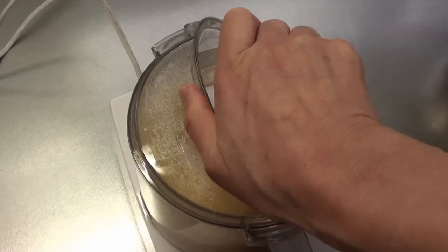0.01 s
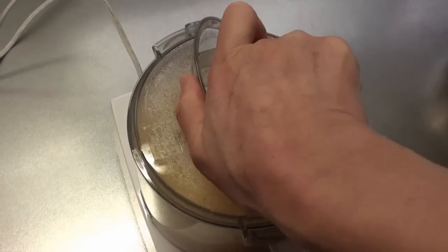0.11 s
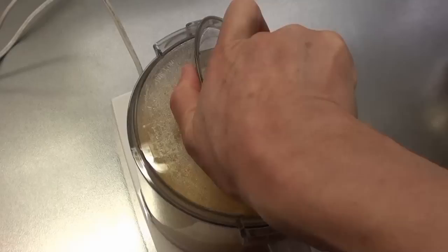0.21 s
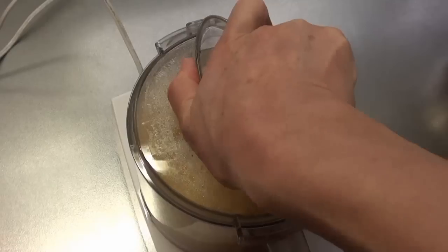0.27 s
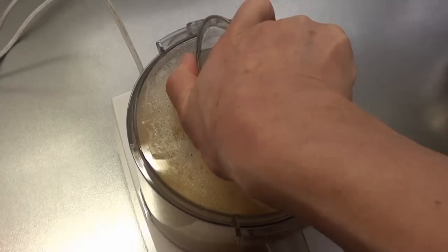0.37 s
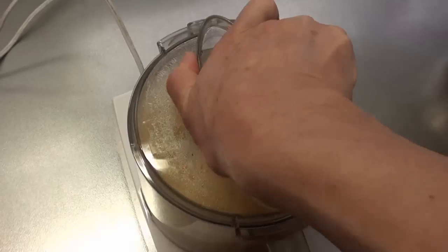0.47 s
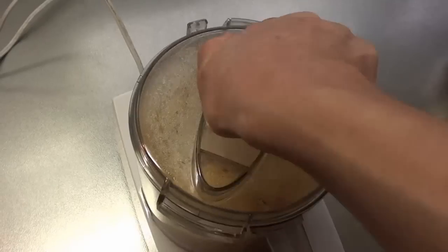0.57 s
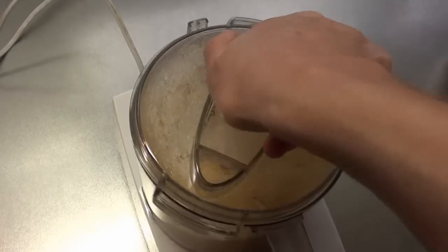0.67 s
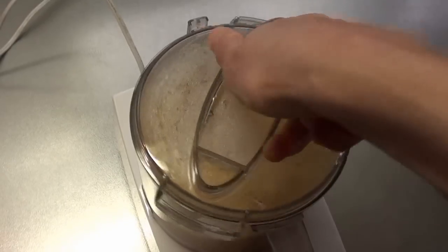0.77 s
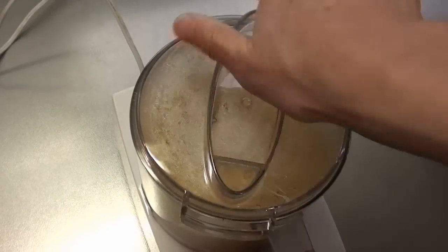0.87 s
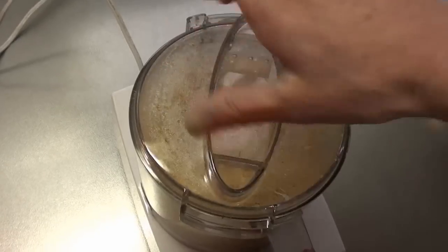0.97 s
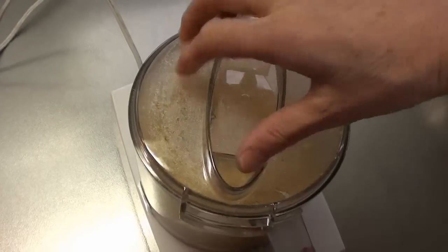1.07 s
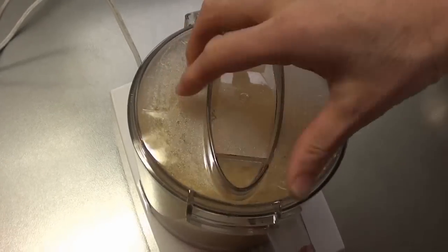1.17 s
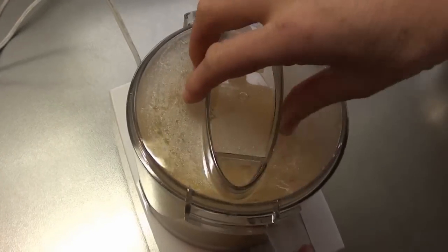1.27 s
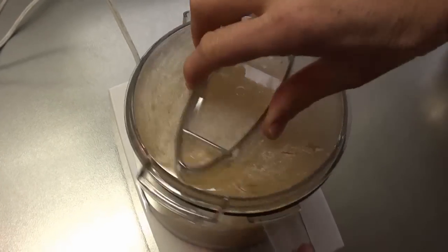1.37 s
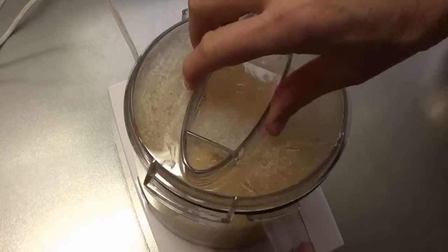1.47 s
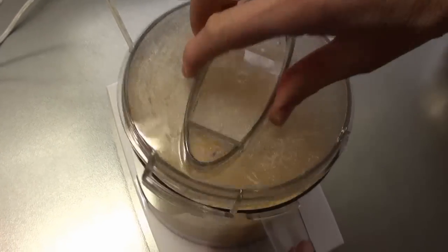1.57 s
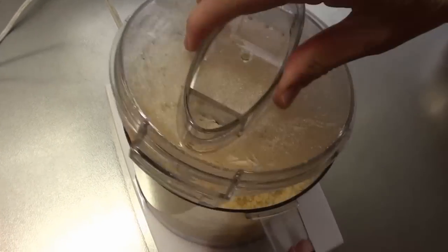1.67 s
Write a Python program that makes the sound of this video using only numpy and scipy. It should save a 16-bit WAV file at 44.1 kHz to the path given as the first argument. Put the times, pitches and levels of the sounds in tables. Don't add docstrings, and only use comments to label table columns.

```python
import sys
import numpy as np
from scipy import signal
from scipy.fft import rfft, irfft, next_fast_len
from scipy.io import wavfile

SR = 44100
rng = np.random.default_rng(int(sys.argv[2]) if len(sys.argv) > 2 else 0)


def to_linear_factor(level_db):
    exponent = np.asarray(level_db, float) / 20
    return 10 ** exponent


def dump(signal):
    limited = np.clip(np.atleast_2d(signal).T, -1, 1)
    pcm = np.round(limited * 32767).astype(np.int16)
    wavfile.write(sys.argv[1], SR, pcm)


N = 77175


def rms_one(x):
    return x / np.sqrt(np.mean(x ** 2) + 1e-20)


def butter(x, order, hz, kind):
    return signal.sosfilt(signal.butter(order, hz, kind, fs=SR, output="sos"), x)


def drift(rate_hz):
    r = np.exp(-2 * np.pi * rate_hz / SR)
    settle = 9000
    noise = rng.standard_normal(N + settle)
    return rms_one(signal.lfilter([1], [1, -2 * r, r * r], noise)[settle:])


def ring(clicks, hz, t60):
    r, w = to_linear_factor(-60 / (t60 * SR)), 2 * np.pi * hz / SR
    return signal.lfilter([0, np.sin(w)], [1, -2 * r * np.cos(w), r * r], clicks + 1e-18)


def colour(x, spectrum, patchy_db):
    edges = 30 * 2 ** np.arange(0, 9.1, .5)
    hz, db = np.transpose(spectrum)
    out = 0
    for k, (low, high) in enumerate(zip(edges, edges[1:])):
        band = butter(x, 2, [low, high], "band")
        level_db = np.interp(np.log(low * high) / 2, np.log(hz), db)
        out = out + (-1) ** k * to_linear_factor(level_db + patchy_db * drift(2.4)) * band
    return rms_one(out)


def pair(alike):
    mid, side = rng.standard_normal((2, N))
    return np.sqrt(1 + alike) * mid + np.sqrt(1 - alike) * side * [[1], [-1]]


def bounced(table):
    bounce_s, loss_db, unevenness = 0.0018, 2.5, 0.223
    rows = np.repeat(np.array(table), 3, axis=0)
    chance = rng.standard_normal((len(rows), 41))
    bounce = np.arange(len(rows)) % 3
    s, db, *rest = rows.T
    s = s + bounce_s * bounce * (1 + unevenness * chance[:, 40])
    return chance, s, db - loss_db * bounce, *rest


def bursts(s, db, t60):
    clicks = np.zeros(N)
    np.add.at(clicks, (s * SR).astype(int), to_linear_factor(db))
    envelope = signal.lfilter([1], [1, -to_linear_factor(-60 / (t60 * SR))], clicks + 1e-18)
    return envelope * rng.standard_normal(N)


def strike(modes, s, db, favoured_hz, chance):
    favour_db_per_octave, spread_db = 15, 2.2
    out = np.zeros(N)
    for k, (hz, mode_db, t60) in enumerate(modes):
        octaves_off = np.abs(np.log2(hz / favoured_hz))
        level_db = db + mode_db - favour_db_per_octave * octaves_off + spread_db * chance[:, k]
        clicks = np.zeros(N)
        np.add.at(clicks, (s * SR).astype(int), np.sign(chance[:, k + 20]) * to_linear_factor(level_db))
        out += ring(clicks, hz, t60)
    return out


# start in seconds, lid level in dB, hollow bowl level in dB against the lid,
# favoured lid pitch in Hz, favoured bowl pitch in Hz.
KNOCKS = [(.012, -25, 5.5, 1920, 226), (.145, -16.5, -13.5, 1370, 526), (.203, -10.5, 2, 1200, 204),
          (.262, -22, -7, 1440, 480), (.285, -12, -31, 2500, 550), (.318, -15.5, -26, 2600, 597),
          (.401, -10, -15.5, 2340, 613), (.584, -19.5, 0, 3400, 636), (.753, -28, 11, 860, 240),
          (.837, -18, 0, 1010, 286), (.856, -17, -14, 1360, 345), (.881, -2.5, -9.5, 1540, 480),
          (.897, -17.5, 1, 835, 480), (.958, -27, 12, 2560, 353), (1.058, -34, 18, 910, 272),
          (1.145, -46, 2, 1400, 346), (1.201, -3.5, -2, 1100, 360), (1.341, -4, -1, 1250, 238),
          (1.424, -14, 4.5, 1300, 700), (1.483, -23, 8.5, 1990, 242), (1.506, -28.5, 2, 1370, 405),
          (1.539, -16.5, -1, 1700, 530), (1.626, -34, 11, 1900, 247), (1.665, -35.5, 5.5, 1900, 550)]
# pitch in Hz, level in dB, t60 in seconds.
BOWL_MODES = [(77.6, -1, 0.052), (106, -64, 0.049), (226, -13, 0.25), (249.3, -16.5, 0.18),
              (382, -1.5, 0.053), (480, 2.5, 0.072), (525.5, -2.5, 0.066), (592, 5.5, 0.031)]
# pitch in Hz, level in dB, t60 in seconds.
LID_MODES = [(810, 0.5, 0.051), (964, -12, 0.025), (1090, -27, 0.06), (1300, -5.5, 0.026),
             (1505, -7.5, 0.06), (1990, -8.5, 0.033), (2198, -3, 0.047), (2600, 6.5, 0.024),
             (2954, -4, 0.098), (3400, 5.5, 0.036), (3660, 16, 0.012)]


def knocks():
    bowl_level_db, lid_level_db, thud_db, boom_db = -14, -13.5, -9.5, -8
    thud_t60_s, bowl_delay_s = 0.055, 0.00088
    chance, s, db, bowl_db, lid_hz, bowl_hz = bounced(KNOCKS)
    thud = butter(bursts(s, db + thud_db, thud_t60_s), 2, [520, 1940], "band")
    boom = butter(bursts(s, db + bowl_db + boom_db, thud_t60_s), 2, [182, 540], "band")
    s, db, bowl_db, lid_hz, bowl_hz, chance = (v[::3] for v in (s, db, bowl_db, lid_hz, bowl_hz, chance))
    bowl = strike(BOWL_MODES, s + bowl_delay_s, db + bowl_db + bowl_level_db, bowl_hz, chance)
    lid = strike(LID_MODES, s, db + lid_level_db, lid_hz, chance[:, ::-1])
    return bowl + lid + thud + boom


# start in seconds, pitch in Hz, level in dB, t60 in seconds.
RINGS = [(0.205, 228, -22, 0.092), (0.202, 1230, -19.5, 0.028), (.318, 566, -31, 0.16),
         (.4015, 557, -20.5, 0.14), (.4015, 2230, -17.5, 0.03), (0.4032, 1454, -26, 0.051),
         (0.586, 635, -36, 0.029), (0.614, 364, -25, 0.2), (.628, 363, -40, 0.27), (.645, 227, -23, 0.11),
         (.753, 238, -25, 0.066), (.755, 515, -23, 0.021), (.838, 248, -26.5, 0.038),
         (.881, 817, -21.5, 0.12), (0.879, 1375, -22.5, 0.096), (.882, 1921, -15, 0.051),
         (0.881, 2970, -24, 0.11), (.882, 477.5, -16, 0.077), (0.896, 456, -23, 0.097),
         (0.956, 265, -27.5, .06), (1.2, 350.5, -11.5, 0.069), (1.202, 238, -15, 0.051),
         (1.202, 630, -13, 0.04), (1.202, 810, -17.5, 0.05), (1.203, 1310, -12, 0.037),
         (1.34, 230, -20, .1), (1.343, 967, -21, 0.084), (1.344, 1940, -21.5, 0.045),
         (1.352, 446, -17, 0.047), (1.343, 841, -28.5, .15), (1.424, 650, -29.5, 0.038),
         (1.422, 1380, -28, 0.093), (1.445, 232, -32, 0.19), (1.506, 836, -29.5, 0.042),
         (1.54, 528, -34, 0.19), (1.54, 1810, -27.5, 0.049), (1.541, 1156, -33, 0.044),
         (1.627, 1954, -41, 0.051), (1.665, 1975, -43.5, 0.097)]


def rings():
    rise_cycles, flutter_db, flutter_hz, flutter_onset_s = 0.52, 3.5, 60, .02
    s, hz, db, t60 = np.transpose(RINGS)[:, :, None]
    age = np.clip(np.arange(N) / SR - s, 0, None)
    flutter = flutter_db * np.array([drift(flutter_hz) for _ in s])
    flutter = flutter * np.clip(age / flutter_onset_s, 0, 1)
    decay = to_linear_factor(db + flutter - 60 * age / t60)
    swell = 1 - np.exp(-age * hz / rise_cycles)
    return (decay * swell * np.sin(2 * np.pi * hz * age)).sum(axis=0)


# start in seconds, level in dB, pitch in Hz.
SNAPS = [(.012, -44, 3950), (.145, -26.5, 4600), (.196, -26.5, 8750), (.203, -17.5, 7070),
         (.247, -47, 4000), (.262, -36, 4160), (.285, -18.5, 3900), (.318, -16.5, 3360),
         (.401, -12.5, 3700), (.404, -14, 3420), (.584, -13.5, 3540), (.597, -11, 3200), (.837, -24, 5900),
         (.881, -21.5, 6700), (1.03, -35.5, 9200), (1.058, -32.5, 7400), (1.141, -46.5, 2620),
         (1.201, -27.5, 4100), (1.311, -52, 3200), (1.330, -29, 3100), (1.341, -25, 6200),
         (1.424, -25.5, 2640), (1.483, -28, 7200), (1.539, -31, 6600), (1.649, -36.5, 7260),
         (1.665, -42, 3330)]


def snaps():
    tone_db, crack_db, crack_t60_s = 7.5, -10, 0.011
    cycles, detune, longest_s = 15, 0.039, .1
    chance, s, db, snap_hz = bounced(SNAPS)
    t = np.arange(N) / SR - s[:, None]
    age = np.clip(t, 0, longest_s)
    decay = to_linear_factor(db[:, None] + tone_db - 60 * age * snap_hz[:, None] / cycles)
    hz = snap_hz * (1 + detune * chance[:, 0])
    tones = decay * np.sin(2 * np.pi * hz[:, None] * age)
    crack = butter(bursts(s, db + crack_db, crack_t60_s), 2, 1800, "high")
    return (tones * (t < longest_s)).sum(axis=0) + crack


# time in seconds, pitch in Hz, level in dB, lowest partial in dB against its usual level.
SQUEAKS = [
    [(.3175, 1365, -50, -6), (.319, 1385, -16.5, -5), (.328, 1330, -17, -9.5), (.335, 1324, -21, 11.5),
     (.341, 1362, -24, -2), (.352, 1325, -30, 0), (.36, 1340, -59, -8), (.37, 1356, -33, 5),
     (.40, 1378, -44, 8)],
    [(.582, 1350, -50, -7), (.586, 1368, -16.5, 8), (.596, 1334, -17, -5.5), (.604, 1356, -18.5, 8),
     (.622, 1336, -30.5, -6), (.655, 1370, -27, -3), (.70, 1330, -35, 4), (.715, 1335, -47, -7),
     (.745, 1380, -39.5, 8.5)],
]
PARTIALS_DB = [-6.5, -0.5, -6, -9, -14, -15, -23, -28]


def squeaks():
    wander_db, wander_hz, jitter, release_s = 2.6, 110, .007, .02
    t = np.arange(N) / SR
    out = 0
    for s, hz, db, lowest_db in map(np.transpose, SQUEAKS):
        pitch = np.interp(t, s, hz) * (1 + jitter * drift(140))
        phase = 2 * np.pi * np.cumsum(pitch) / SR
        stack = 0
        for k, partial_db in enumerate(PARTIALS_DB):
            level_db = partial_db + wander_db * drift(wander_hz)
            if k == 0:
                level_db = level_db + np.interp(t, s, lowest_db)
            stack = stack + to_linear_factor(level_db) * np.sin((k + 1) * phase + rng.uniform(0, 2 * np.pi))
        release_db = 20 * np.clip(t - s[-1], 0, None) / release_s
        out = out + to_linear_factor(np.interp(t, s, db, left=-99) - release_db) * stack
    return out


# time in seconds, level in dB, hollow share in dB.
STROKES = [
    [(0, -38, 9), (.03, -47, -57), (.07, -63, -4), (.14, -56.5, 4), (.19, -46.5, 5.5), (.27, -51, 6.5),
     (.325, -38, -24), (.41, -33.5, -20), (.5, -47.5, -3.5)],
    [(.562, -57, -5), (.572, -43.5, -17), (.586, -23.5, -27), (.61, -16.5, -10.5), (.635, -18.5, -8.5),
     (.66, -24, -6.5), (.69, -36.5, -4), (.76, -43, -8.5)],
    [(.833, -53, -3), (.84, -31.5, -14.5), (.872, -37.5, 9), (.885, -21, -15), (.91, -35.5, 1),
     (.965, -45, -9), (1.0, -52, -4), (1.07, -55, -1)],
    [(1.19, -49.5, 2), (1.3, -60, 11), (1.315, -46.5, 6), (1.40, -53.5, 8.5), (1.425, -32.5, -4),
     (1.46, -37.5, -1), (1.49, -40.5, 1), (1.53, -65, 5), (1.61, -82, 16), (1.665, -43, -1.5),
     (1.7, -76, 9)],
]
# frequency in Hz, density in dB per Hz.
RASP_COLOUR = [(410, -85), (700, -8), (2380, -5.5), (2630, -2), (4430, -9.5), (5450, -9), (11000, -13.5),
               (14300, -44), (22000, -120)]
# pitch in Hz, level in dB, t60 in seconds.
STROKE_MODES = [(102, -13, 0.097), (226, -8.5, 0.19), (362.3, -6, 0.11), (480, -4, 0.02),
                (545, -7.5, 0.086), (650, 1, 0.028)]


def rubbing():
    grains_per_s, spread_db, flutter_db, lid_db = 8000, 3.2, 2.2, -7
    s, db, hollow_db = np.transpose([row for stroke in STROKES for row in stroke])
    t = np.arange(N) / SR
    sizes = to_linear_factor(spread_db * np.minimum(rng.exponential(1, N), 4))
    sizes = sizes * (rng.random(N) < grains_per_s / SR)
    grains = rms_one(sizes) * pair(alike=0.75) * to_linear_factor(flutter_db * drift(40))
    rasp = colour(grains, [(300, -40)] + list(RASP_COLOUR), patchy_db=1.5)
    bright = rasp + to_linear_factor(lid_db) * body(LID_MODES, grains)
    hollow = to_linear_factor(np.interp(t, s, hollow_db)) * body(STROKE_MODES, grains)
    return to_linear_factor(np.interp(t, s, db)) * (bright + hollow)


def body(modes, grains):
    return rms_one(sum(to_linear_factor(db) * (-1) ** k * ring(grains, hz, t60) for k, (hz, db, t60) in enumerate(modes)))


def kitchen(x):
    t60_s, wall_cut_hz = 0.17, 2000
    size = next_fast_len(N + SR)
    w = 2 * np.pi * np.arange(size // 2 + 1) / size
    out = np.zeros((2, N))
    dull = 1 / (1 + 1j * w * SR / (2 * np.pi * wall_cut_hz)) ** 0.12
    lags = (rng.uniform(.006, .028, 16) * SR).astype(int)
    for k, lag in enumerate(lags):
        loop = to_linear_factor(-60 * lag / SR / t60_s) * dull * np.exp(-1j * w * lag)
        echoes = irfft(rfft(x, size) * loop / (1 - loop), size)[:N]
        out[k % 2] += (-1) ** (k // 2) * echoes
    return out


# frequency in Hz, density in dB per Hz.
HUSH_COLOUR = [(30, 0), (160, -12), (222, -2.5), (540, -3.5), (900, -8), (7000, -16.5), (10400, -14.5),
               (14500, -21)]


def hush():
    return to_linear_factor(-53.5) * colour(pair(alike=0.56), HUSH_COLOUR, patchy_db=.7)


def scene():
    room_db, room_width, wide_above_hz = -12, 0.68, 800
    lid = knocks() + rings() + snaps() + squeaks()
    rub = rubbing()
    left, right = to_linear_factor(room_db) * kitchen(lid + rub.mean(axis=0))
    side = room_width * butter(left - right, 1, wide_above_hz, "high") / 2
    close = lid + rub + (left + right) / 2 + side * [[1], [-1]]
    close = butter(close, 3, 110, "high")
    close = butter(close, 4, 9320, "low")
    return close + hush()


def roll_off(x):
    return signal.sosfilt(signal.butter(12, 15250, fs=SR, output="sos"), x)


def record(dry):
    limit, cutoff_hz = .75, 15400
    rounded = limit * np.tanh(dry / limit)
    mix = signal.sosfilt(signal.cheby2(12, 60, cutoff_hz, fs=SR, output="sos"), rounded)
    return roll_off(mix)


dry = scene()
out = record(dry)
dump(out)
```